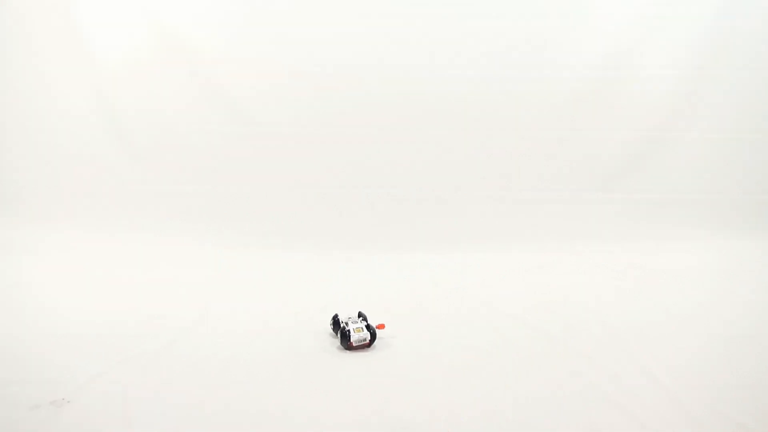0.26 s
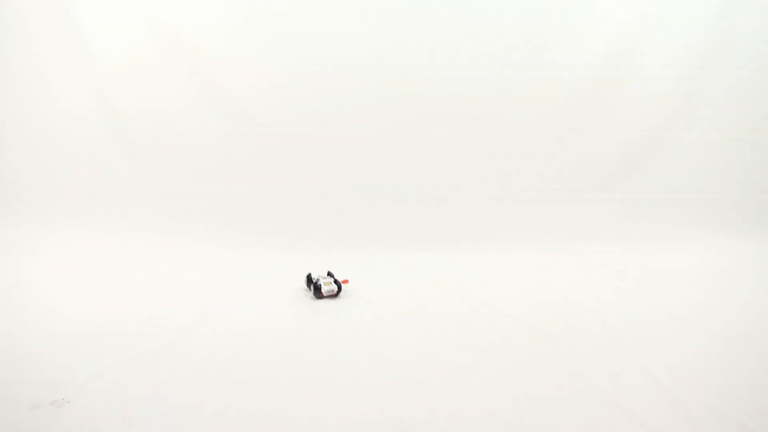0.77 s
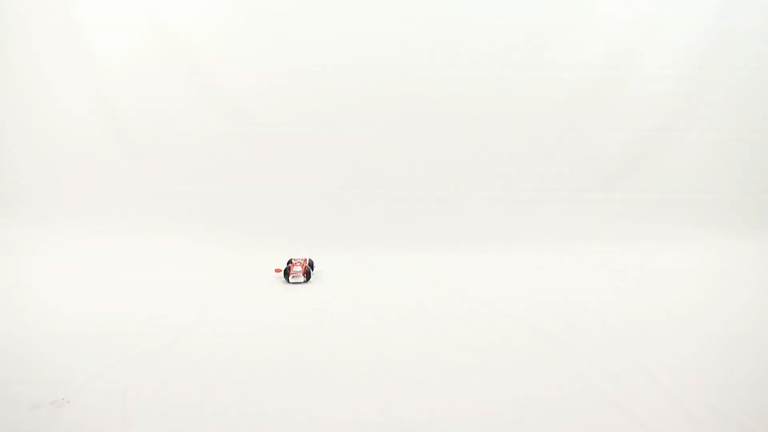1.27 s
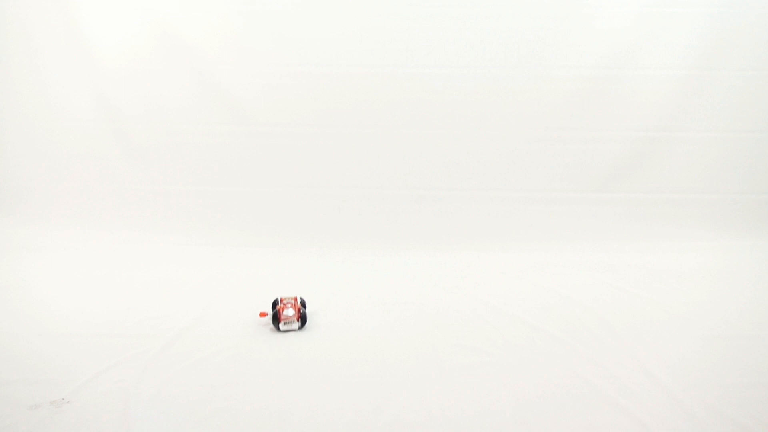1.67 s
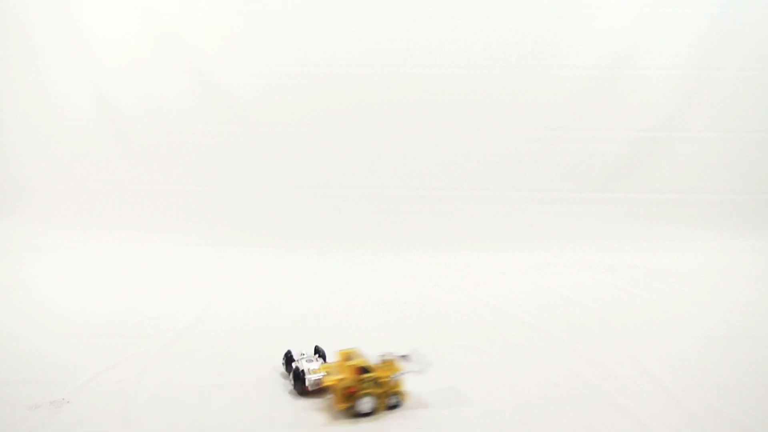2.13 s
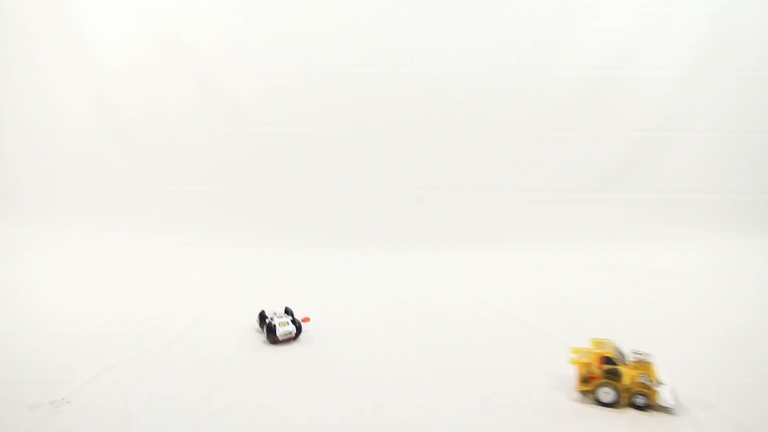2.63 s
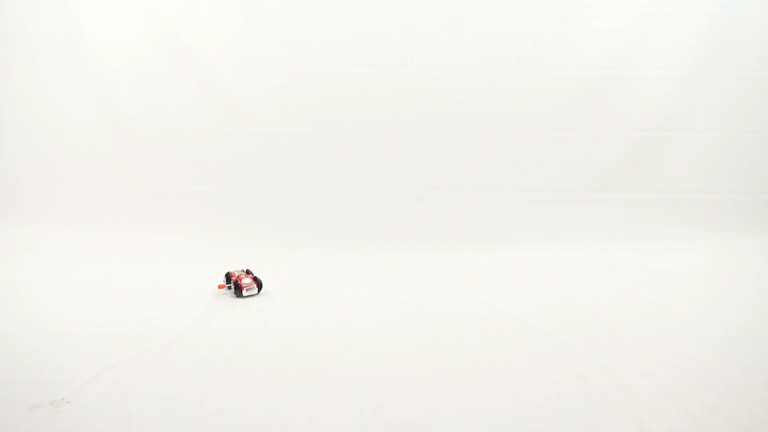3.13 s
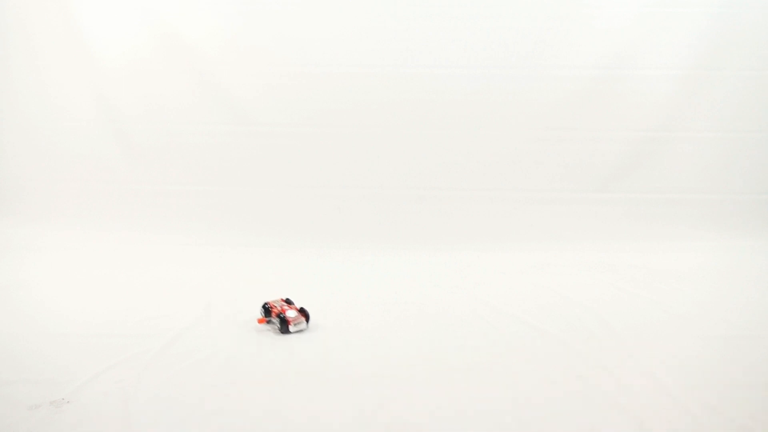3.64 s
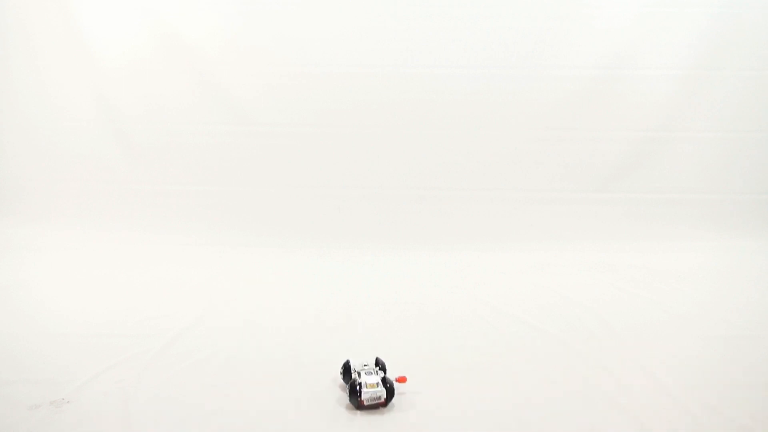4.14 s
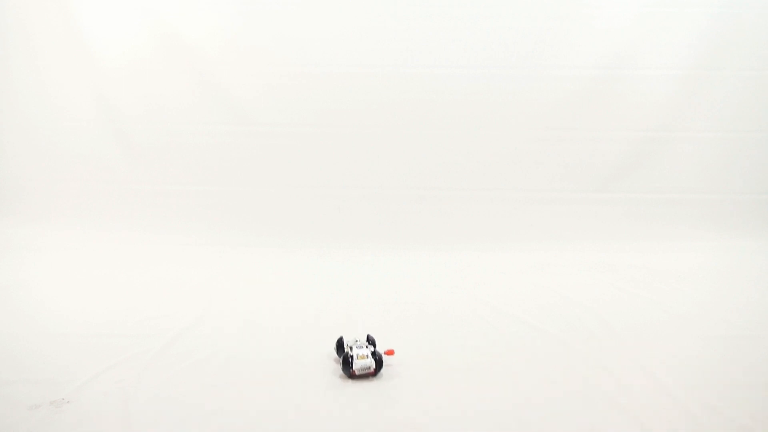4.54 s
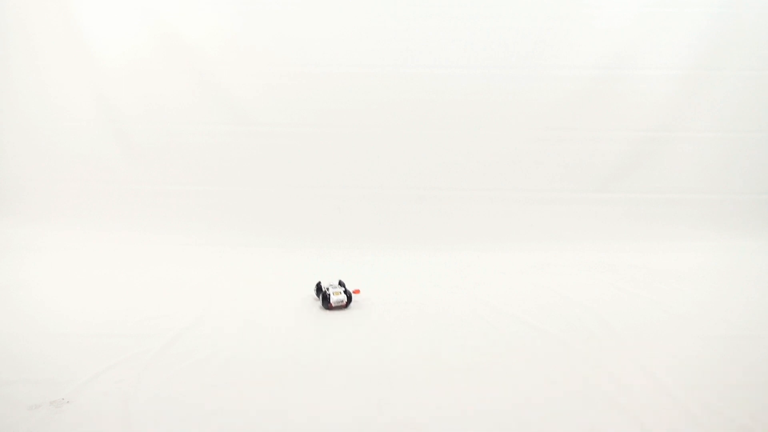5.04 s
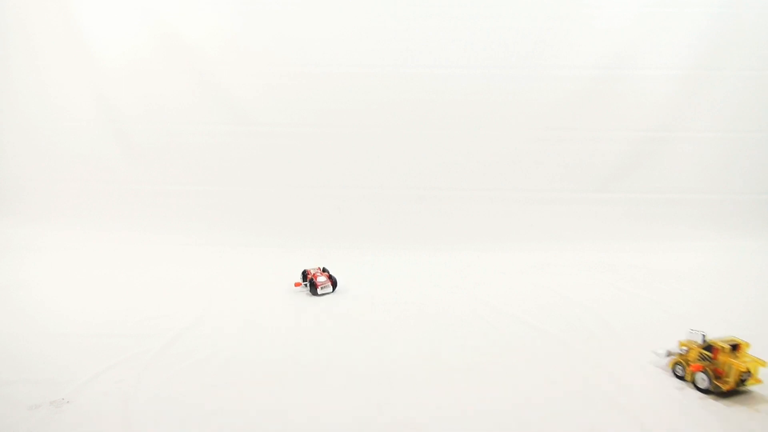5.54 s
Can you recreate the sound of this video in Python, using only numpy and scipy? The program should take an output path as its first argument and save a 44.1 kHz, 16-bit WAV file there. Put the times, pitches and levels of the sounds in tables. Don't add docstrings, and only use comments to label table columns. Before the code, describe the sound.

Small clockwork toy cars whir with a bright gear hiss on a hollow tabletop, clacking and knocking as they flip and land.

```python
import sys
import numpy as np
from scipy import signal
from scipy.fft import rfft, irfft
from scipy.io import wavfile

SR = 44100
rng = np.random.default_rng(int(sys.argv[2]) if len(sys.argv) > 2 else 0)


def voltage_ratio(level):
    return 10 ** (np.asarray(level, float) / 20)


def store_wav(level_fs):
    pcm = np.round(np.clip(np.atleast_2d(level_fs), -1, 1) * 32767)
    wavfile.write(sys.argv[1], SR, pcm.T.astype(np.int16))


N = 255780

# f/Hz, level/dB, time to fade by 60 dB/s
SHELL_MODES = [(1280, -63, 0.014), (1600, -17.5, 0.21), (1680, -9.5, 0.046), (1740, -12.5, 0.082),
               (1800, -4, 0.0068), (1895, -11.5, 0.084), (1930, -19, 0.011), (2077, -7, 0.076),
               (2308, 4, 0.024), (2507, -12, 0.15), (3150, -19, 0.041)]
CHASSIS_MODES = [(2806, 6.5, 0.0046), (3300, -5, 0.014), (3907, 0.5, 0.0049), (4190, -6, 0.0067),
                 (4550, -7.5, 0.0046), (5070, -4.5, 0.0038), (5780, -5, 0.0038), (5920, -1.5, 0.0095),
                 (6380, 11.5, 0.002)]
BOARD_MODES = [(145.8, -25.5, 0.55), (173.5, -11.5, 0.19), (209.3, -8.5, 0.047), (267, -13.5, 0.061),
               (290, -25, 0.06)]
HOLLOW_MODES = [(315, -27, 0.065), (420, -10.5, 0.04), (519, -7, 0.025), (650, -13.5, 0.083),
                (740, -6.5, 0.032), (855, -2.5, 0.023), (1120, 0, 0.014), (1260, -8, 0.043)]

JOLT_FADE_DB_PER_S = 382


def gear_hiss(throb, patchy_db):
    # f/Hz, level per Hz/dB
    colour = [(3500, -14.5), (5000, -7), (6000, -2.5), (8000, -4.5), (11200, -4.5), (11450, 0.5),
              (13000, 2), (14500, -1.5), (15700, -2)]
    # f/Hz, likeness/0..1
    likeness = [(4500, 0.45), (6000, 0.13), (11200, 0.22), (11450, 0.98)]
    hz = np.arange(N // 2 + 1) * SR / N
    near, other = [rfft(contacts(12000, 2.9)) * voltage_ratio(at_hz(colour, hz)) for side in range(2)]
    both = pair(near, other, at_hz(likeness, hz))
    out = 0
    for centre_hz in np.arange(3200, 16800, 800):
        band = np.clip(1 - np.abs(hz - centre_hz) / 800, 0, 1)
        out = out + voltage_ratio(patchy_db * drift(5.5)) * irfft(both * band, N)
    return throb * rms_one(out)


def gear_rasp(rasp_db, rasp_hz, throb):
    frame = rattle(CHASSIS_MODES, 6000, 2.5, 1.5, .6, rasp_hz, width=.2)
    return voltage_ratio(rasp_db - 1) * throb * frame


def stalls():
    # t/s, gear loss/dB, shell loss/dB, half length/s
    dips = [(.268, -1.5, 4, .04), (.455, -.5, 4, .032), (.651, 8.5, 21, .032), (.926, 3, 3, .046),
            (1.295, 11, 3, .056), (1.69, 2.5, 4.5, .12), (1.831, -1, 11, .012), (2.406, 6, -3, .039),
            (2.425, 0, 6, .01), (3.11, 1, 6, .049), (3.645, 0, 7, .049), (4.45, 6, 6.5, .13),
            (4.725, 14, 5, .026), (4.856, 10, -3, .075), (4.89, 3, 20, .058), (4.91, 0, 16, .028),
            (4.953, 8, 2.5, .059), (4.985, 1, 6, .01), (5.005, 11, 0, .036), (5.153, 3, 0, .01),
            (5.536, 4.5, 8, .25), (5.588, 5, 16, .067)]
    s, *depths_db, half_s = np.transpose(dips)

    def dip(db):
        return coarse(lambda t: -np.sum(db * np.clip(1 - np.abs(t - s) / half_s, 0, 1), axis=1))

    return [dip(db) for db in depths_db]


def drone():
    runs = [(1.95, 2.13, 690, 640, -57), (1.975, 2.13, 1330, 1270, -46), (2.12, 2.3, 1130, 1090, -54),
            (2.17, 2.33, 2760, 2830, -52), (.5, .56, 1500, 1290, -54), (3.13, 3.22, 780, 745, -61),
            (3.2, 3.55, 720, 810, -62), (3.53, 3.8, 790, 815, -61.5), (4.19, 4.33, 780, 850, -59),
            (4.31, 4.41, 850, 830, -60), (4.52, 4.66, 795, 825, -59), (5.33, 5.41, 1650, 1700, -52),
            (-.1, .3, 4550, 4500, -43.5), (1.9, 2.36, 4950, 5250, -45), (.28, .44, 1600, 1700, -45),
            (.47, .59, 2000, 1960, -46), (2.44, 2.56, 2000, 1940, -47), (2.5, 2.86, 1650, 1550, -53),
            (4.99, 5.17, 1750, 1620, -49), (.36, .6, 4940, 5600, -52), (3.4, 3.96, 4500, 4450, -54),
            (4.12, 4.64, 4500, 4500, -54), (3.98, 4.075, 2250, 2280, -50), (.32, .41, 2000, 2050, -47),
            (.74, .83, 2000, 2000, -44), (1.12, 1.17, 1950, 1950, -47), (.66, .725, 1950, 1950, -46),
            (4.805, 4.84, 2480, 2480, -49), (3.15, 3.77, 1500, 1600, -59), (3.2, 3.8, 2200, 2290, -59.5),
            (4.19, 4.37, 1700, 1700, -54), (3.15, 3.6, 1750, 1800, -56), (5.19, 5.29, 1450, 1450, -53),
            (-.05, .075, 1650, 1560, -47), (.11, .17, 1600, 1650, -48), (1.34, 1.825, 1930, 2000, -57),
            (5.67, 5.78, 1750, 1850, -54), (5.65, 5.7, 2250, 2270, -55), (4.44, 4.52, 815, 795, -64),
            (1.99, 2.14, 1930, 1960, -45), (2.03, 2.18, 1580, 1560, -47), (2.315, 2.35, 1640, 1620, -46),
            (2.57, 2.68, 1800, 1850, -51), (2.99, 3.05, 1650, 1640, -51)]
    evenness = .3
    out, t = np.zeros(N), np.arange(N) / SR
    waver = 1 + 0.00786 * drift(8.57)
    broken = voltage_ratio(1.2 * drift(18))

    def sway_pair(width_hz):
        low = signal.butter(2, width_hz, fs=SR, output="sos")
        return rms_one(signal.sosfilt(low, rng.standard_normal((2, N))))

    thin, soft, wide, broad = [sway_pair(width_hz) for width_hz in (30, 42, 75, 360)]
    for start, end, first_hz, last_hz, db in runs:
        fade_s = .022
        if first_hz > 4000:
            kind, fade_s = broad, .022 * 4
        elif 1440 < last_hz < 2200:
            kind = wide
        elif last_hz < 900:
            kind = soft
        else:
            kind = thin
        on = (t > start) & (t < end)
        gate = np.clip(np.minimum(t[on] - start, end - t[on]) / fade_s, 0, 1)
        pitch_hz = np.interp(t[on], [start, end], [first_hz, last_hz]) * waver[on]
        turn = 2 * np.pi * np.cumsum(pitch_hz) / SR
        sway, other = kind[:, on]
        song = (sway * np.sin(turn) + other * np.cos(turn)) / (sway ** 2 + other ** 2 + .1) ** evenness
        out[on] += gate * broken[on] * voltage_ratio(db + 1.5) * song
    return out


def shell_rattle(shell_db, shell_hz, throb):
    shell = rattle(SHELL_MODES, 900, 2.6, 1.3, .45, shell_hz, width=.17)
    return above(voltage_ratio(shell_db - 4.0) * throb * shell, 1130)


def table_rumble(board_db, shell_db, lift_db):
    board = voltage_ratio(board_db) * rattle(BOARD_MODES, 400, 3.95, 2.2, 0.86)
    hollow_db = 0.58 * board_db + 0.35 * shell_db + .15 * lift_db - 7.5
    return board + voltage_ratio(hollow_db) * rattle(HOLLOW_MODES, 500, 1.93, 3.0, 0.6)


def clacks(s, clack_db, crack_db, shell_hz, crack_hz):
    # f/Hz, level/dB, time to fade by 60 dB/s
    snap_modes = [(7400, 15, 0.0032), (9500, -16, 0.0022), (13100, 2, 0.0033), (14700, 1, .004)]
    shell = knocks(s, SHELL_MODES, clack_db - 19, 460, shell_hz)
    frame = knocks(s, CHASSIS_MODES, crack_db - 6.5, 450, crack_hz, width=0.52)
    return shell + frame + knocks(s, snap_modes, crack_db - 17, 430)


def taps():
    # t/s, level/dB, f/Hz
    touches = [(.034, -43, 1730), (0.058, -36, 1680), (.0885, -24, 2300), (0.0913, -20, 2400),
               (.138, -31, 1650), (.589, -24, 1800), (.5925, -16, 1800), (0.603, -20, 1750),
               (0.609, -19.5, 1920), (0.6168, -18.5, 1800), (0.6304, -26, 1910), (0.874, -28, 2850),
               (0.88, -21, 2400), (0.8804, -25, 3700), (1.8389, -12.5, 1800), (1.8432, -11.5, 1695),
               (1.855, -22, 1800), (2.3524, -28, 1800), (2.3562, -21.5, 2100), (2.3592, -16, 2010),
               (2.3622, -17, 2420), (2.8535, -19, 4800), (2.854, -24, 2520), (2.872, -32, 1800),
               (2.9625, -18.5, 2350), (2.967, -21, 2300), (4.0736, -22.5, 2590), (4.0738, -19, 4800),
               (4.6622, -16, 1930), (4.666, -18, 1950), (5.1622, -18.5, 2400), (5.163, -17, 4970),
               (5.165, -32, 3850), (5.293, -22, 2360), (5.25, -35, 1010), (5.193, -31.5, 1440),
               (5.431, -25, 1800), (5.172, -26, 2400), (2.4345, -19.5, 1640), (4.994, -29, 1730),
               (5.4222, -24, 1800), (0.377, -26.5, 1720), (1.9535, -21, 2740), (4.126, -26, 3600),
               (.805, -26, 4100), (.156, -27, 728), (.087, -31, 713), (.506, -38.5, 544),
               (1.9515, -27.5, 694), (1.954, -21, 2190), (1.997, -28, 1890), (2.158, -29, 1580),
               (2.431, -28, 1660), (2.466, -31, 1980), (2.515, -27, 1830), (2.667, -32, 1880),
               (4.658, -19, 1691), (4.65, -28, 2180), (4.662, -23, 2800), (4.673, -26, 1690),
               (4.13, -39, 1160), (2.864, -38, 1250)]
    cycles = 23
    out, t = np.zeros(N + SR), np.arange(SR // 20) / SR
    for s, db, hz in touches:
        fade = voltage_ratio(db + 0.5 - 60 * t * hz / cycles)
        push = 1 - np.exp(-t * hz * 0.77)
        out[int(s * SR):][:len(t)] += fade * push * np.sin(2 * np.pi * hz * t)
    return out[:N]


def landings(s, thump_db, body_db, hollow_hz):
    thump = knocks(s, BOARD_MODES, thump_db + 0.5, 790)
    return thump + knocks(s, HOLLOW_MODES, body_db + 2.5, 480, hollow_hz, width=0.53)


def place(x, lr_db):
    # f/Hz, share/0..1
    sideways = [(500, 0), (1000, 0.82), (1900, 1), (3200, 0.29), (4400, 0)]
    centre_db, shade_per_db, lead_rad_per_db = 6.5, 0.32, -0.01
    hz = np.arange(N // 2 + 1) * SR / N
    middle = signal.hilbert(irfft(rfft(x) * np.clip(at_hz(sideways, hz), 0, 1), N))
    off_db = (lr_db - centre_db) * np.array([[.5], [-.5]])
    change = voltage_ratio(shade_per_db * off_db) * np.exp(1j * lead_rad_per_db * off_db) - 1
    return pan(x + np.real(middle * change), lr_db)


def room(x):
    t60_s, level_db = .2, -16
    t = np.arange(int(.4 * SR)) / SR
    tail = rng.standard_normal((2, len(t))) * voltage_ratio(-60 * t / t60_s) * (t > .004)
    tail = signal.lfilter([.4], [1, -.6], tail)
    tail /= np.sqrt(np.sum(tail ** 2, axis=1, keepdims=True))
    return voltage_ratio(level_db) * signal.fftconvolve(x, tail, axes=1)[:, :N]


def air():
    # f/Hz, level per Hz/dB
    colour = [(20, -26), (50, -7), (78, 1.5), (110, -10), (300, -10), (900, -9), (2000, -8), (5000, 4.5),
              (11000, 2.5), (16000, -23)]
    # f/Hz, likeness/0..1
    likeness = [(30, .1), (70, 0.26), (200, 0.99), (2000, 1), (5000, 0), (12000, 0.29)]
    hz = np.arange(N // 2 + 1) * SR / N
    near, other = rfft(rng.standard_normal((2, N))) * voltage_ratio(at_hz(colour, hz))
    noise = rms_one(irfft(pair(near, other, at_hz(likeness, hz)), N))
    return voltage_ratio(-47 - 5.5) * pan(noise, np.array([2.5]))


def rattle(modes, per_s, spread_db, patchy_db, damping, centre_hz=None, width=.3):
    hits = [contacts(per_s, spread_db) for k in range(3)]
    out = 0
    for k, (hz, db, t60) in enumerate(modes):
        lean_db = 0 if centre_hz is None else favour(hz, centre_hz, width)
        swell = voltage_ratio(db + lean_db + patchy_db * drift(5.8))
        out = out + swell * ring(hits[k % 3], hz, t60 * damping)
    return rms_one(above(out, 0.78 * modes[0][0]))


def knocks(s, body, db, fade_db, centre_hz=None, width=0.37):
    after = np.cumsum(rng.uniform(.0006, .0032, (len(s), 10)), axis=1)
    after -= after[:, :1]
    at = np.minimum(((s[:, None] + after) * SR).astype(int), N - 1)
    first_db = 6 * (after == 0)
    sound = 0
    for hz, mode_db, t60 in body:
        per_knock = rng.normal(0, 2.2, (len(s), 1))
        per_bounce = rng.normal(0, 2.14, at.shape)
        lean_db = 0 if centre_hz is None else favour(hz, centre_hz[:, None], width)
        sign = np.where(after > 0, rng.choice([-1, 1], at.shape), 1)
        touch_db = db[:, None] + mode_db + lean_db + first_db + per_knock + per_bounce - fade_db * after
        clicks = np.zeros(N)
        clicks[at] = sign * voltage_ratio(touch_db)
        sound = sound + ring(clicks, hz, t60)
    return above(sound, 1.015 * body[0][0])


def contacts(per_s, spread_db):
    sizes = voltage_ratio(spread_db * np.minimum(rng.exponential(1, N), 5)) * rng.choice([-1, 1], N)
    return sizes * (rng.random(N) < per_s / SR)


def ring(clicks, hz, t60):
    r, w = voltage_ratio(-60 / (t60 * SR)), 2 * np.pi * hz / SR
    return signal.lfilter([0, np.sin(w)], [1, -2 * r * np.cos(w), r * r], clicks + 1e-18)


def favour(hz, centre_hz, width):
    return -np.minimum((np.log2(hz / centre_hz) / width) ** 2, 2.5) * 6


def above(x, hz):
    return signal.sosfilt(signal.butter(4, hz, "high", fs=SR, output="sos"), x)


def stirred(steady_db, s, db, fade_db_per_s):
    def bursts(t):
        rise = np.clip((t - s) / 0.0029, 0, 1)
        return np.sum(rise * voltage_ratio(2 * (db - fade_db_per_s * np.maximum(t - s, 0))), axis=1)

    return 10 * np.log10(voltage_ratio(2 * steady_db) + coarse(bursts))


def coarse(shape):
    t = np.arange(0, N / SR + .002, .001)
    return np.interp(np.arange(N) / SR, t, shape(t[:, None]))


def drift(rate):
    r = np.exp(-80 * np.pi * rate / SR)
    slow = signal.lfilter([1], [1, -2 * r, r * r], rng.standard_normal(N // 40 + 2002))[2000:]
    return np.interp(np.arange(N) / 40, np.arange(len(slow)), rms_one(slow))


def in_time(rows):
    s, *columns = np.transpose(rows)
    return [np.interp(np.arange(N) / SR, s, c) for c in columns]


def at_hz(points, hz):
    table_hz, values = np.transpose(points)
    return np.interp(np.log(hz + 1), np.log(table_hz), values)


def rms_one(x):
    return x / np.sqrt(np.mean(x ** 2) + 1e-20)


def pair(near, other, alike):
    alike = np.clip(alike, 0, 1)
    return np.sqrt(1 + alike) * near + np.sqrt(1 - alike) * other * [[1], [-1]]


def pan(x, lr_db):
    return x * voltage_ratio(np.array([lr_db / 2, -lr_db / 2]))


def scene():
    # t/s, gear effort/dB, left over right/dB, rasp f/Hz
    run = [(0, -37.5, 7.5, 4250), (.17, -37.5, 8.5, 4500), (.32, -43, 8.5, 5660), (.46, -39, 10, 5660),
           (.58, -41.5, 10.5, 5500), (.8, -36.5, 11.5, 4560), (1, -37, 10, 5160), (1.15, -45, 12, 4700),
           (1.5, -39.5, 13, 4620), (2.03, -35.5, 10, 5000), (2.57, -43, 5, 4660), (3.07, -40, 6.5, 4630),
           (3.22, -45, 3.5, 5040), (4.15, -42.5, 6.5, 4550), (4.67, -43.5, 2, 5030), (5.08, -38, 5, 4800),
           (5.3, -39, 5, 5300), (5.8, -45.5, 4, 4900)]
    # t/s, shell shaking/dB, weight on the board/dB, shell f/Hz
    wheels = [(0, -39, -62, 1800), (.15, -41, -81, 1800), (.42, -43.5, -68, 1860), (.7, -48, -86, 1840),
              (.95, -40.5, -66, 1940), (1.26, -58, -81, 1930), (1.79, -45.5, -67.5, 1890),
              (1.88, -34, -63, 1750), (2.3, -42, -65, 1820), (2.6, -42, -64.5, 1660),
              (2.95, -45.5, -62.5, 1890), (3.15, -49.5, -69.5, 1800), (3.95, -52.5, -65.5, 1860),
              (4.25, -49.5, -69, 1890), (4.55, -46, -65, 1830), (5.1, -44.5, -72, 1680),
              (5.44, -39, -64, 1740), (5.8, -49, -64, 1800)]
    # t/s, shell/dB, bright crack/dB, chatter left behind/dB, crack f/Hz
    small_clacks = [(0.076, -33, -42, -36, 3300), (0.0892, -34, -29.5, -38, 4200),
                    (0.2094, -42, -33.5, -58, 5600), (.2917, -45, -55, -53, 4000),
                    (.379, -34, -44, -38, 4000), (.4778, -38, -55, -42, 4000), (.4994, -38, -55, -47, 4000),
                    (0.592, -26, -32.5, -31, 5000), (.6166, -21, -44, -40, 4000),
                    (0.6684, -36, -61, -37.5, 4000), (0.6995, -36, -60, -41, 4030),
                    (0.7522, -26, -52, -37.5, 4000), (0.8039, -22, -41, -31, 4100),
                    (.817, -35, -34, -34, 5600), (0.8742, -36, -27.5, -38, 3900),
                    (.9627, -39, -55, -42, 4000), (.9952, -36, -28.5, -34.5, 3070),
                    (1.1283, -31, -62, -41, 4000), (3.145, -39, -59, -43.5, 4000),
                    (3.275, -27.5, -61, -45, 4000), (3.695, -48, -57, -44, 4000),
                    (3.9762, -26, -31.5, -45.5, 4080), (4.0738, -31, -29, -40, 3620),
                    (4.126, -39, -31, -36.5, 3600), (4.6571, -21, -32, -28.5, 4000),
                    (4.6616, -17.5, -27, -42, 3180), (4.7296, -42, -37, -39, 4100),
                    (4.797, -28, -57, -41, 4000), (4.9926, -36, -37.5, -36, 3900)]
    big_clacks = [(1.8379, -14.5, -23.5, -26, 4030), (1.8437, -28, -27.5, -30, 4000),
                  (1.953, -21, -37, -42, 2900), (2.3494, -13, -23, -29, 3840), (2.359, -19, -30, -35, 4300),
                  (2.4345, -23, -34.5, -45, 4300), (2.464, -45, -35, -34.5, 4320),
                  (2.66, -45, -38, -38, 4300), (2.8528, -27, -30, -53, 4700),
                  (2.962, -38, -30.5, -36, 2900), (3.0177, -35, -38, -39, 3500),
                  (5.1631, -34, -29, -46, 3680), (5.248, -35, -33, -49, 2900), (5.29, -30, -33, -50, 2800),
                  (5.4232, -25, -61, -35, 3100), (5.5111, -31, -43, -39, 3500)]
    # t/s, board thump/dB, hollow body/dB, hollow f/Hz
    touchdowns = [(0.074, -54, -46.5, 700), (0.0907, -50, -45.5, 740), (0.1558, -47.5, -55, 740),
                  (0.2098, -58, -48, 710), (0.4197, -50.5, -49, 350), (0.5, -49.5, -39, 380),
                  (0.525, -68, -51, 423), (.817, -74, -59, 1070), (0.874, -58, -44.5, 1210),
                  (0.9437, -67, -48, 500), (0.9265, -70, -54, 520), (1.029, -62, -49, 440),
                  (0.753, -77, -57, 900), (.837, -76, -55, 600), (0.9953, -57, -46, 1150),
                  (1.841, -40, -41, 1160), (1.952, -43.5, -41, 650), (2.3512, -53, -48, 732),
                  (2.3588, -59, -59, 1180), (2.4364, -49, -42.5, 425), (2.8544, -60, -47.5, 1210),
                  (2.9605, -45.5, -38, 560), (3.0187, -48, -45, 410), (3.977, -60, -55, 1120),
                  (4.0745, -41.5, -35.5, 457), (4.126, -53.5, -47, 520), (4.6607, -52, -48, 1220),
                  (4.7442, -52, -50, 420), (4.8, -54.5, -50, 327), (4.839, -56, -63, 320),
                  (4.685, -63, -68, 420), (4.715, -55, -70, 400), (4.961, -58, -54, 400),
                  (4.9942, -58, -58, 420), (5.162, -63, -48, 1110), (5.247, -59, -44, 450),
                  (5.291, -44.5, -36.5, 342), (5.4267, -51.5, -74, 810), (5.582, -51, -58, 587)]
    effort_db, lr_db, rasp_hz = in_time(run)
    shake_db, weight_db, shell_hz = in_time(wheels)
    clack_s, clack_db, crack_db, chatter_db, crack_hz = np.transpose(small_clacks + big_clacks)
    land_s, thump_db, body_db, hollow_hz = np.transpose(touchdowns)
    stall_db, lift_db = stalls()

    jolt_db = np.maximum(crack_db - 11, chatter_db - 5.5)
    gear_db = stirred(effort_db + stall_db, clack_s, jolt_db, JOLT_FADE_DB_PER_S)
    rasp_db = 0.54 * effort_db + 0.47 * shake_db - 1.0 + .5 * stall_db + 0.099 * lift_db
    rasp_db = stirred(rasp_db, clack_s, crack_db - 5.0, JOLT_FADE_DB_PER_S)
    shell_db = stirred(shake_db + lift_db, clack_s, chatter_db, 338)
    board_db = stirred(weight_db + 0.061 * lift_db, land_s, thump_db - 8.5, 96)

    throb = voltage_ratio(1.1 * drift(4.1) + 0.69 * drift(17.0))
    running = gear_rasp(rasp_db, rasp_hz, throb) + drone() + shell_rattle(shell_db, shell_hz, throb)
    running = running + table_rumble(board_db, shell_db, lift_db)
    shell_hz_then = shell_hz[(clack_s * SR).astype(int)]
    tumbles = clacks(clack_s, clack_db, crack_db, shell_hz_then, crack_hz) + taps()
    body = place(running + tumbles + landings(land_s, thump_db, body_db, hollow_hz), lr_db)
    gears = pan(voltage_ratio(gear_db + 1.5), lr_db * 0.5) * gear_hiss(throb, patchy_db=0.5)
    return body + room(body) + gears + air()


def band_limit(x):
    return signal.sosfilt(signal.butter(12, 17040, fs=SR, output="sos"), x)


def record(dry):
    # f/Hz, left lead/rad
    ports = [(0, 0), (4400, .1), (5200, .6), (6000, 2.2), (7300, 2.2), (9000, 3), (11150, 3.2),
             (11450, 6.28), (22050, 6.28)]
    # f/Hz, left over right/dB
    left_tilt = [(40, 5), (150, 0.5), (600, -4), (2000, -4.5), (12000, -2)]
    # f/Hz, level/dB
    top_cut = [(15700, 0), (15790, -40), (16100, -62), (17000, -72), (17100, -110)]
    hz = np.arange(N // 2 + 1) * SR / N
    lead = np.exp(1j * np.interp(hz, *np.transpose(ports)) * [[1], [0]])
    colour = pan(voltage_ratio(at_hz(top_cut, hz)), at_hz(left_tilt, hz))
    mix = irfft(rfft(dry) * lead * colour, N)
    return band_limit(mix)


dry = scene()
out = record(dry)
store_wav(out)
```